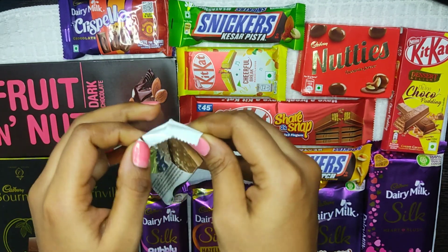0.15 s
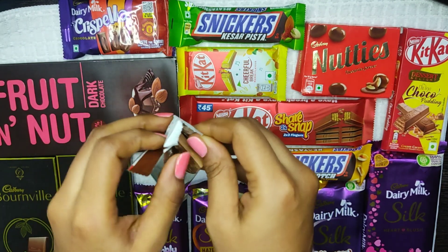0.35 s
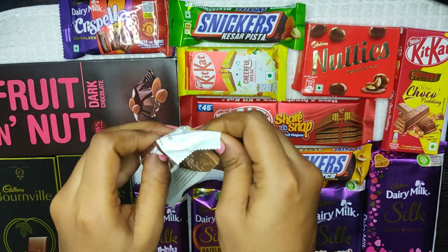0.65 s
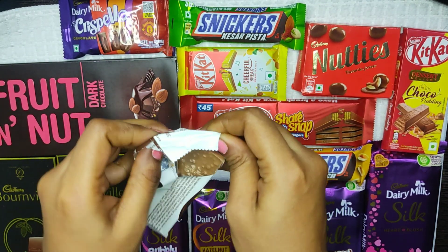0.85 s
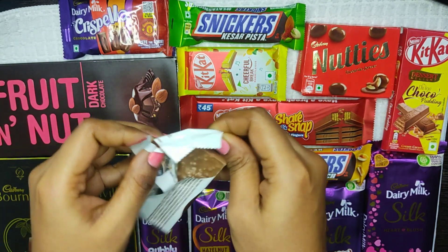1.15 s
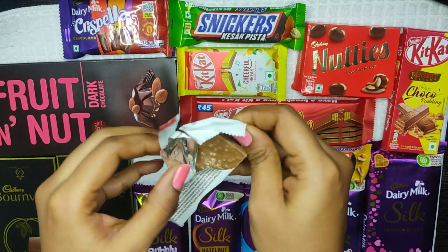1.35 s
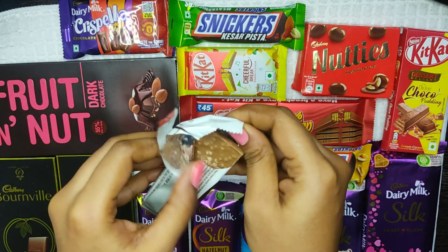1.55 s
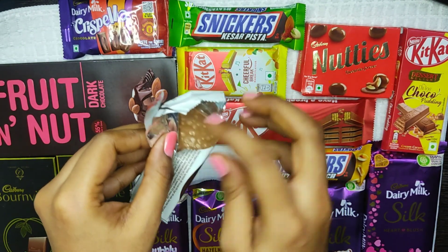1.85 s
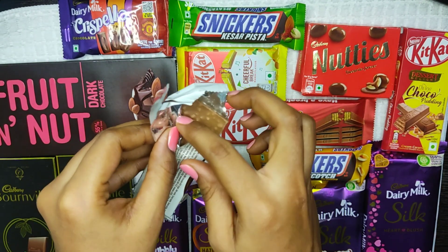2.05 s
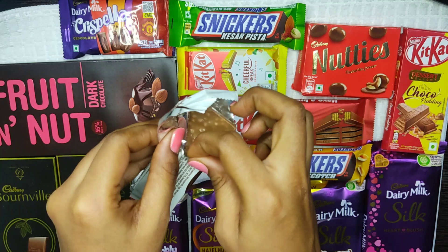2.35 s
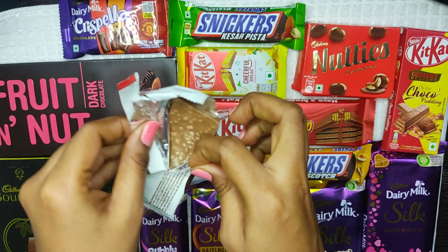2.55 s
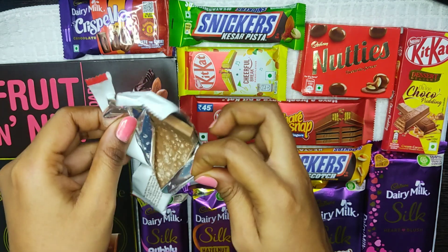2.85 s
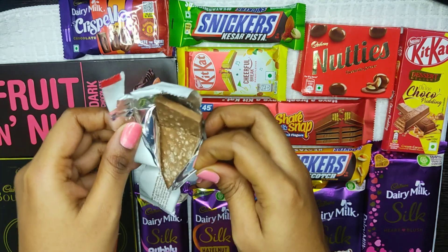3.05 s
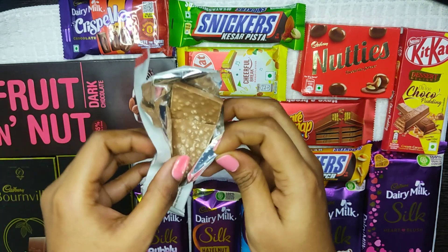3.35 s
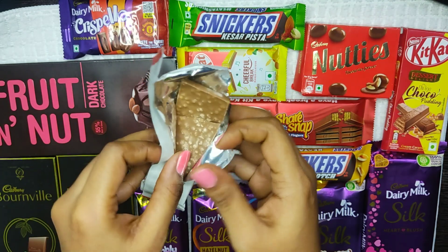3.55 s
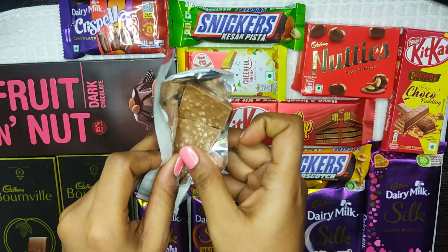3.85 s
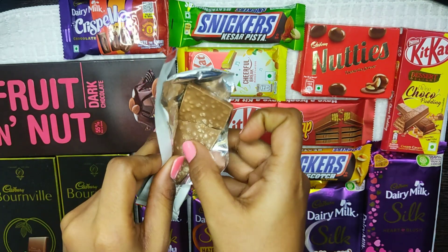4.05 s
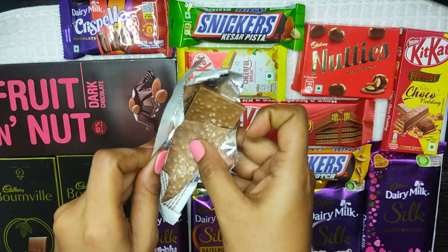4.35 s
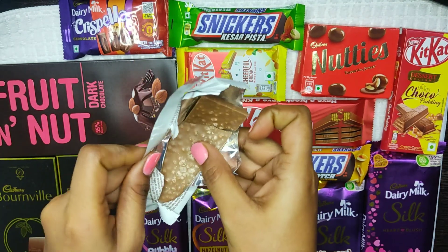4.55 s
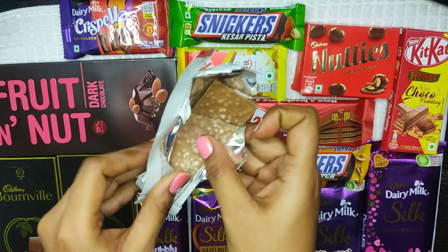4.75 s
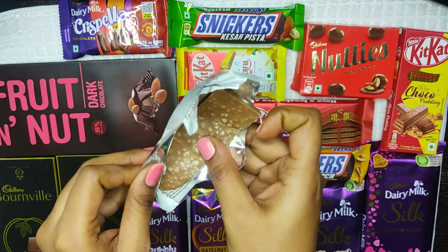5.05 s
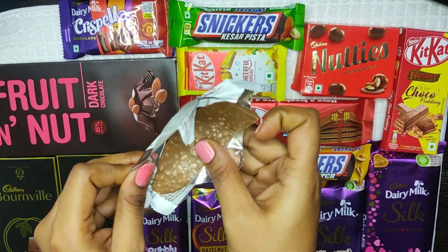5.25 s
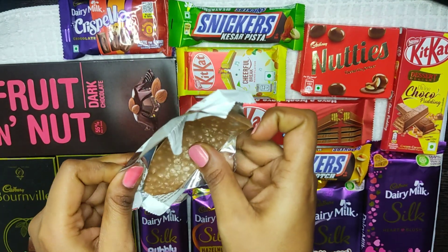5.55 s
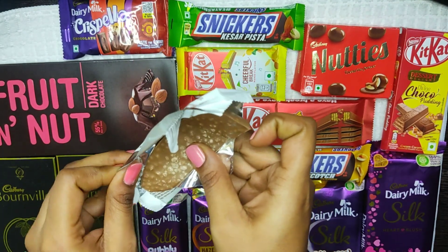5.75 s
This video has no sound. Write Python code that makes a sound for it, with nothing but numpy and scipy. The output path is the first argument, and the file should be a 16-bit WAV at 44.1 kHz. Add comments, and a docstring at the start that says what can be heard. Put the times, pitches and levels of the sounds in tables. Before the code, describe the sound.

Close stereo pickup in a small, hard room with a brief bright ring. A quiet bed of low rushing air, barely perceptible hum, soft hiss and a thin, wavering high whine runs throughout. Two tiny foil ticks come in the first 0.3 seconds; from 0.5 a crinkly burst and short rub lead to a hard, sharp crack at about 0.76. Scattered snaps follow at 1.07, 1.2 and 1.4, with a small scratch around 1.65. After a lull, a gentle rub grows into a firmer tear at 2.5, and a dense crackle peaks near 2.7. Light, sparse ticks and faint rustles continue from 3 to 4. A quick rip and strong cluster of snaps hits at 4.2 to 4.3, then small dull bar knocks, a crisp crack at 4.9 and busy crinkling from 5.0 to 5.3. Only two faint ticks remain, near 5.6 and 5.7.

```python
"""Fingers peel a foil and paper wrapper off a chocolate bar, close to the microphone in a small hard room.
Each crease snaps as a click with a few ms of flutter; strokes of rubbing and tearing are streams of tiny slips.
The bar knocks dully as a damped sine, and dense decaying reflections make the room ring briefly.
Behind lie a low rush of air with a faint hum, a soft hiss and a thin high whine, all filtered noise."""
import sys
import numpy as np
from scipy import signal
from scipy.fft import rfft, irfft
from scipy.io import wavfile
from scipy.ndimage import uniform_filter1d, minimum_filter1d

SR = 44100
rng = np.random.default_rng(int(sys.argv[2]) if len(sys.argv) > 2 else 0)


def output_pcm(signal):
    """Save a mono or channel-first signal as 16-bit PCM at the path in sys.argv[1].

    Samples are clipped to [-1, 1] before scaling.
    """
    pcm = np.clip(np.atleast_2d(signal).T, -1, 1) * 32767
    wavfile.write(sys.argv[1], SR, np.round(pcm).astype(np.int16))


N = 260190
BINS = np.fft.rfftfreq(N, 1 / SR)
TIME = np.arange(N) / SR

# spectrum of the rushing air: [f/Hz, relative density/dB]
AIR_SPECTRUM = [(20, 5.5), (40, -3.5), (90, -11.5), (130, -3.5), (400, -4.5), (650, -9.5), (1000, -11),
                (1300, -96)]
# spectrum of the soft hiss: [f/Hz, relative density/dB]
HISS_SPECTRUM = [(600, -10.5), (1000, 6), (1400, 5.5), (3200, -5.5), (5000, -15), (6700, -7.5), (7500, 0.5),
                 (8800, -7), (10200, -38), (16000, -53)]
# likeness of the background noise at the two ports: [f/Hz, left-right correlation]
AIR_CORRELATION = [(40, 0), (130, 0.9), (640, 0.38), (1400, 0), (7000, 0.52)]
# stereo balance of the background noise: [f/Hz, left minus right/dB]
NOISE_BALANCE = [(60, 3.5), (200, 7.5), (380, 3), (4400, -0.5), (8000, -6), (15000, 29)]
# hum components in the air: [f/Hz, level/dB]
HUM_TONES = [(208, -68), (308, -71), (395, -67.5)]
# time for the room's reflections to fall by 60 dB: [f/Hz, t/s]
DECAY_TIMES = [(500, 0.11), (2000, 0.36), (8000, 0.3)]
# colour of the room's reflections: [f/Hz, level/dB]
REFLECTION_COLOUR = [(500, 8), (1500, -1), (3000, -1), (7500, 0), (14000, -8)]
# the right microphone port resonates lower than the left: [f/Hz, left minus right/dB]
PORT_BALANCE = [(1800, 4), (5500, 2), (7000, -5), (8000, -0.5), (9000, 9.5), (10300, 9), (13000, 2.5)]
# dull knocks of the bar against the fingers: [t/s, f/Hz, level/dB rms over 10 ms]
BAR_KNOCKS = [(0.8148, 620, -52), (1.0662, 1490, -46.5), (1.3871, 750, -60), (2.573, 760, -53),
              (2.694, 1270, -45), (2.9629, 1560, -50.5), (3.737, 780, -54.5), (4.4545, 700, -52),
              (4.714, 690, -50), (4.7665, 700, -53), (5.0879, 1300, -45.5), (5.161, 770, -49.5)]
# strokes of the fingers, rubbing or tearing the wrapper: [start t/s, length t/s, relative level/dB]
FINGER_STROKES = [(0.517, 0.059, -46.5), (0.702, 0.22, -52), (1.21, 0.056, -46), (1.645, 0.02, -40),
                  (2.245, 0.18, -59), (2.474, 0.074, -37), (2.602, 0.079, -44), (3.524, 0.025, -47),
                  (3.724, 0.016, -50.5), (4.235, 0.018, -38), (4.688, 0.12, -55.5), (5.133, 0.078, -46.5)]
# spectrum of the sliding wrapper: [f/Hz, relative density/dB]
SLIDE_SPECTRUM = [(300, -22.5), (700, -17.5), (3100, -15), (6300, -8.5), (7800, 2.5), (9200, 0),
                  (11500, -21.5), (16000, -29)]
# creases snapping: [t/s, then relative level/dB of paper body, foil crack, foil sizzle and top fizz]
CREASE_SNAPS = [(0.1139, -48.5, -45, -37, -58), (0.2735, -53, -49.5, -38.5, -55),
                (0.484, -55, -49.5, -60, -80), (0.496, -61, -51, -46.5, -72), (0.51, -54, -41.5, -38, -58),
                (0.5338, -50, -40.5, -32.5, -47), (0.606, -54.5, -51, -43.5, -69),
                (0.687, -49.5, -50, -49, -84), (0.7238, -55, -51, -37, -65),
                (0.758, -42.5, -25, -23, -35.5), (0.8147, -45, -50, -34, -62), (1.066, -43, -44, -30, -52),
                (1.2007, -43.5, -32, -31.5, -36.5), (1.2183, -45.5, -53, -36.5, -52),
                (1.364, -49, -44.5, -41, -62), (1.387, -49, -68, -51, -74), (1.629, -53.5, -57.5, -34, -47),
                (1.7117, -46.5, -46.5, -37, -62), (1.7272, -56, -41, -35, -51), (2.468, -63, -49, -40, -56),
                (2.605, -56, -62, -41, -60), (2.6682, -59, -50, -43, -67), (2.6843, -46, -55, -55, -61),
                (2.694, -37.5, -30.5, -23.5, -61), (2.7171, -59, -45, -30, -58),
                (2.743, -56, -47, -33.5, -50), (2.775, -46.5, -47.5, -46, -68),
                (2.8007, -55, -56, -40.5, -60), (2.9622, -48, -58.5, -51, -73),
                (3.218, -48, -54.5, -48.5, -73), (3.3706, -70, -57, -47, -68),
                (3.527, -48.5, -57, -54, -64), (3.6345, -53.5, -52.5, -43.5, -64),
                (3.74, -51.5, -51.5, -45.5, -69), (3.8107, -54, -48.5, -45.5, -62.5),
                (3.82, -62, -61, -48.5, -72), (3.8973, -60, -56.5, -45, -79),
                (4.0307, -62, -57.5, -46, -68), (4.213, -58, -52, -43, -57),
                (4.2256, -52, -42.5, -32.5, -45), (4.2399, -35, -43, -49, -50), (4.248, -36, -37, -38, -46),
                (4.256, -46, -41, -37, -60), (4.2689, -39.5, -31, -21.5, -39.5),
                (4.418, -59, -57, -43, -58), (4.4547, -40.5, -54, -48.5, -71),
                (4.507, -51.5, -51, -44.5, -57), (4.515, -51.5, -58, -57, -72),
                (4.714, -44.5, -42.5, -38, -62), (4.7665, -51.5, -56, -53, -64),
                (4.907, -57, -56, -42, -58), (4.914, -52, -44, -25.5, -42), (5.01, -50.5, -55, -46, -77),
                (5.044, -64, -61, -46.5, -60), (5.0879, -41.5, -50, -37.5, -51),
                (5.119, -60, -40, -36.5, -60), (5.161, -40, -36, -31.5, -47),
                (5.266, -54, -42.5, -30.5, -48), (5.2688, -51, -44.5, -33, -52),
                (5.6052, -72, -56, -46, -82), (5.729, -62, -52, -42.5, -70)]
# spectrum of the snapping wrapper within each band: [f/Hz, relative density/dB]
WRAPPER_SPECTRUM = [(250, -28.5), (550, -21.5), (1100, -15.5), (1450, -7.5), (1900, -12.5), (2900, -10),
                    (3900, -15), (5200, -9), (6200, -9), (7600, 2), (9100, 1), (10800, -17.5),
                    (12700, -27.5), (16000, -34.5)]
# where the creases snap as the fingers move about: [t/s, left minus right/dB]
CREASE_PLACES = [(1.4, -4.5), (1.63, 4), (1.73, -5), (4.72, -6), (4.91, -2), (5.1, -3.5)]
# crossovers between body, crack, sizzle and fizz: [f/Hz]
BAND_EDGES = [3000, 6500, 10500]

AIR_DB, HISS_DB = -55, -61.5
WHINE_HZ, WHINE_DB, WHINE_WIDTH_HZ = 7803, -64, 110  # width: offset at which the amplitude halves
# a stroke builds up and lets go with these time constants, each lengthened by a share of the stroke
ATTACK_S, RELEASE_S, EASE_SHARE = 0.0078, 0.012, 0.37
HOLD_DB = -69.5  # relative level of the wrapper stirring in the hands between strokes
SLIPS_PER_S, SLIP_SPREAD_DB, RUB = 1400, 2.5, 0.25  # rate, unevenness, smooth rub beneath the slips
WRINKLES_PER_S, WRINKLE_DB, WRINKLE_DECAY_S = 40, 6, 0.0018  # WRINKLE_DB: before merging
CEILING_DB, EDGE_HZ = -3.5, 16600  # limiter ceiling ahead of the band limit; low-pass edge


def amp(db):
    """Level law: converts decibels to an amplitude ratio."""
    return 10 ** (np.asarray(db) / 20)


def unit(x):
    """Normalisation: scales to a root mean square of one."""
    return x / np.sqrt(np.mean(x ** 2) + 1e-20)


def read(points, hz):
    """Interpolation: reads a table on a logarithmic frequency axis."""
    f, value = np.transpose(points)
    return np.interp(np.log(hz + 1), np.log(f + 1), value)


def sides(balance_db):
    """Constant-power panning: left and right gains for a level difference."""
    pair = np.array([amp(balance_db / 2), amp(-balance_db / 2)]).reshape(2, -1)
    return pair / np.sqrt(np.mean(pair ** 2, 0))


def causal(gain):
    """Minimum phase: folding the cepstrum gives a response that starts at once and rings out."""
    cepstrum = irfft(np.log(np.maximum(gain, 1e-5)))
    half = len(cepstrum) // 2
    cepstrum[1:half] *= 2
    cepstrum[half + 1:] = 0
    return np.exp(rfft(cepstrum))


def add(mix, s, sound):
    """Superposition: adds a stereo sound to the mix at time s."""
    part = mix[:, max(round(s * SR), 0):][:, :sound.shape[1]]
    part += sound[:, :part.shape[1]]


def steady(gain):
    """Partial coherence: stationary noise of a given spectrum, partly alike at the two ports."""
    left, other = rfft(rng.standard_normal((2, N)))
    same = np.clip(read(AIR_CORRELATION, BINS), -1, 1)
    right = same * left + np.sqrt(1 - same ** 2) * other
    shaped = np.array([left, right]) * gain * sides(read(NOISE_BALANCE, BINS))
    return unit(irfft(shaped, N))


def resonance(hz, width_hz):
    """Resonance curve: a narrow peak, which turns noise into a wavering tone."""
    return 1 / (1 + ((BINS - hz) / width_hz) ** 2)


def background(hum_width_hz=5, whine_balance_db=-3):
    """Filtered noise: broad bands give rushing air and hiss, narrow ones a wavering hum and a whine."""
    air = amp(AIR_DB) * steady(amp(read(AIR_SPECTRUM, BINS)))
    hiss = amp(HISS_DB) * steady(amp(read(HISS_SPECTRUM, BINS)))
    hum = sum(amp(db) * steady(resonance(hz, hum_width_hz)) for hz, db in HUM_TONES)
    whine = amp(WHINE_DB) * steady(resonance(WHINE_HZ, WHINE_WIDTH_HZ))
    return air + hiss + hum + whine * sides(whine_balance_db)  # balance adds to the noise's own


def room(x, wet_db=-3.5, taps_per_s=1800, build_s=0.015, shared=0.44, balance_db=-0.5, size=22050):
    """Reverberation: dense reflections build up and decay at a rate set by frequency, the lows fastest."""
    taps = rng.standard_normal((3, size)) * (rng.random((3, size)) < taps_per_s / SR)
    hz, t, z = signal.stft(taps[:2] + shared * taps[2], SR, nperseg=256)
    z = z * amp(-60 * t / read(DECAY_TIMES, hz)[:, None])
    tail = signal.istft(z, SR, nperseg=256)[1][:, :size]
    tail *= np.minimum(np.arange(size) / SR / build_s, 1)
    tail /= np.linalg.norm(tail, axis=1, keepdims=True)
    colour = amp(read(REFLECTION_COLOUR, np.fft.rfftfreq(size, 1 / SR)))
    tail = irfft(rfft(tail) * causal(colour))
    return amp(wet_db) * sides(balance_db) * signal.fftconvolve(x, tail, axes=1)[:, :N]


def knocks(decay_s=0.0016, size=1024):
    """Damped oscillation: the hand-held bar rings for a few cycles, at a pitch set by the grip."""
    out, t = np.zeros((2, N)), np.arange(size) / SR
    for s, hz, db in BAR_KNOCKS:
        ring = np.sin(2 * np.pi * hz * t) * np.exp(-t / decay_s)
        rms = np.sqrt(np.sum(ring ** 2) * 100 / SR)  # over 10 ms
        add(out, s, sides(0) * amp(db) * ring / rms)
    return out


def effort_db():
    """Power addition: every stroke rises, holds and falls exponentially to the resting touch."""
    power = amp(HOLD_DB) ** 2
    for start, length, db in FINGER_STROKES:
        ease_s = EASE_SHARE * length  # a longer stroke is gentler
        early = np.maximum(start - TIME, 0) / (ATTACK_S + ease_s)
        late = np.maximum(TIME - start - length, 0) / (RELEASE_S + ease_s)
        power = power + (amp(db) * np.exp(-early - late)) ** 2
    return 10 * np.log10(power)


def slide(clump_db=1.9, balance_db=-4.5, firm_db=-59, merging=0.51, size=512):
    """Stick-slip friction: clumps of tiny uneven slips, with small wrinkles giving way now and then."""
    level_db = effort_db()
    slip_db = SLIP_SPREAD_DB * np.minimum(rng.exponential(1, N), 4)
    slips = (rng.random(N) < SLIPS_PER_S / SR) * amp(slip_db)
    grain = rng.standard_normal((3, N))
    # the foil catches and lets go, so the slips bunch over about ten ms
    clumps = amp(clump_db * unit(uniform_filter1d(rng.standard_normal(N), size)))
    # a light touch frees single wrinkles; in a firm pull they merge into the stream
    wrinkle_db = WRINKLE_DB - merging * np.maximum(level_db - firm_db, 0)
    wrinkles = (rng.random(N) < WRINKLES_PER_S / SR) * rng.random(N) * amp(wrinkle_db)
    decay = np.exp(-np.arange(size) / SR / WRINKLE_DECAY_S)
    flutter = signal.oaconvolve(wrinkles, decay)[:N]
    stream = (clumps * (slips + RUB) + flutter) * (grain[2] + grain[:2])  # grain[2] is common to both sides
    sound = unit(irfft(rfft(stream) * causal(amp(read(SLIDE_SPECTRUM, BINS))), N))
    return sound * sides(balance_db) * amp(level_db)


def snaps(flutter=0.36, flutter_s=0.0034, bounce_s=0.0012, bounce=0.35, lag_rad=1.89, in_step_hz=8300,
          wander_s=3e-5, size=2048):
    """Snap-through buckling: a crease flips with a click, the sheet flutters, a near surface reflects."""
    lead = size // 16  # the click sits a short way into its frame, and the frame is placed that much earlier
    out, t = np.zeros((2, N)), (np.arange(size) - lead) / SR
    hz = np.fft.rfftfreq(size, 1 / SR)
    colour, band = amp(read(WRAPPER_SPECTRUM, hz)), np.searchsorted(BAND_EDGES, hz)
    for s, *levels_db in CREASE_SNAPS:
        grain = rng.standard_normal((3, size))
        burst = flutter * (grain[2] + grain[:2]) * np.exp(-(t / flutter_s) ** 2) * (t >= 0)
        burst[:, lead] += 2
        delay_s = bounce_s * rng.uniform(0.499, 2)
        click = rfft(burst) * (1 + bounce * np.exp(-2j * np.pi * hz * delay_s))
        # the left port lags in the midrange, with a small random shift, either way, for each snap
        lag = lag_rad * np.sin(np.pi * np.minimum(hz / in_step_hz, 1))
        lag += 2 * np.pi * hz * wander_s * rng.uniform(-1.04, 1)
        click[0] *= np.exp(-1j * lag)
        # broad folds knock, small ones sizzle: each snap has its own mix of the four bands
        band_power = np.bincount(band, np.mean(abs(click * colour) ** 2, 0))
        lift_db = levels_db - 10 * np.log10(band_power)
        blended_db = uniform_filter1d(lift_db[band], size * 1000 // SR)  # over 1 kHz
        ring = irfft(click * causal(unit(colour * amp(blended_db))))
        power = np.sum(amp(levels_db) ** 2)
        # the level is an rms over 10 ms
        ring *= np.sqrt(power * SR / 100 / np.sum(ring ** 2, 1, keepdims=True))
        balance_db = np.interp(s, *np.transpose(CREASE_PLACES))
        add(out, s - lead / SR, sides(balance_db) * ring)
    return out


def scene(snap_db=-0.5, slide_db=-1, turn_hz=0.8185):
    """Superposition: the wrapper and its reflections, heard through two ports, over the background."""
    wrapper = amp(snap_db) * snaps() + amp(slide_db) * slide() + knocks()
    # as the hands move, the pattern of reflections keeps changing: two patterns trade places
    turn = 2 * np.pi * turn_hz * TIME
    reflections = room(wrapper * np.cos(turn)) + room(wrapper * np.sin(turn))
    heard = irfft(rfft(wrapper + reflections) * sides(read(PORT_BALANCE, BINS)), N)
    return heard + background()


def record(dry, size=161):
    """Peak limiting: a fast gain holds down the hardest snaps; a low-pass then limits the band."""
    gain = np.minimum(1, amp(CEILING_DB) / (abs(dry).max(0) + 1e-9))
    gain = uniform_filter1d(minimum_filter1d(gain, size), size)
    lowpass = signal.firwin(511, EDGE_HZ, window=("kaiser", 9), fs=SR)
    return signal.oaconvolve(dry * gain, lowpass[None], "same")


dry = scene()
out = record(dry)
output_pcm(out)
```